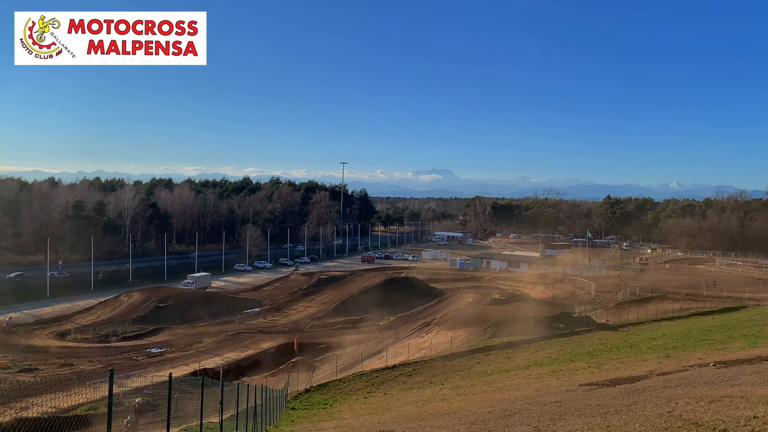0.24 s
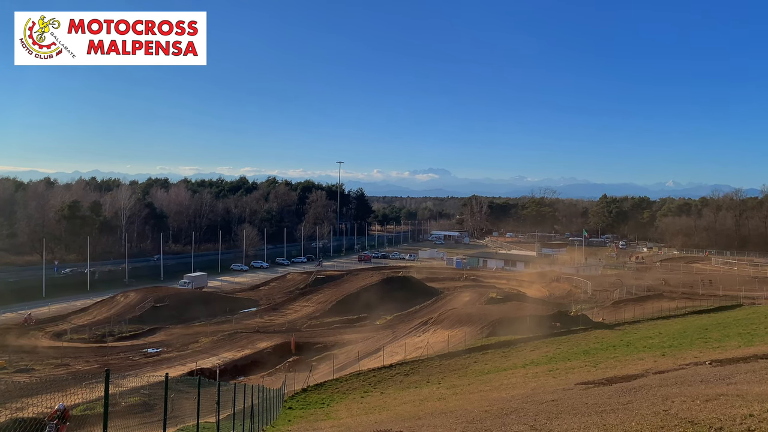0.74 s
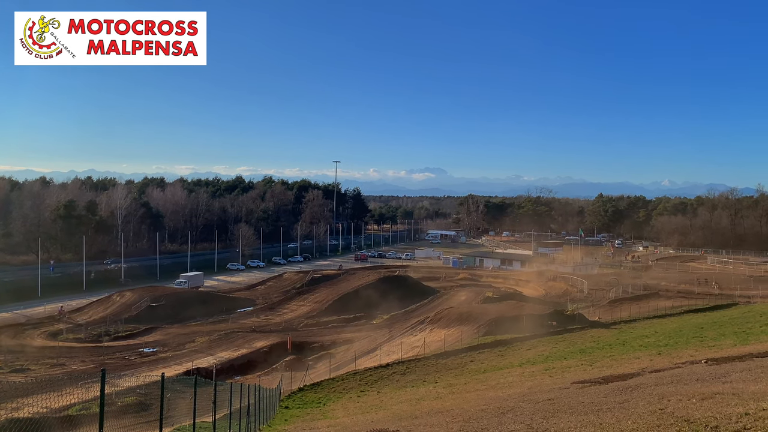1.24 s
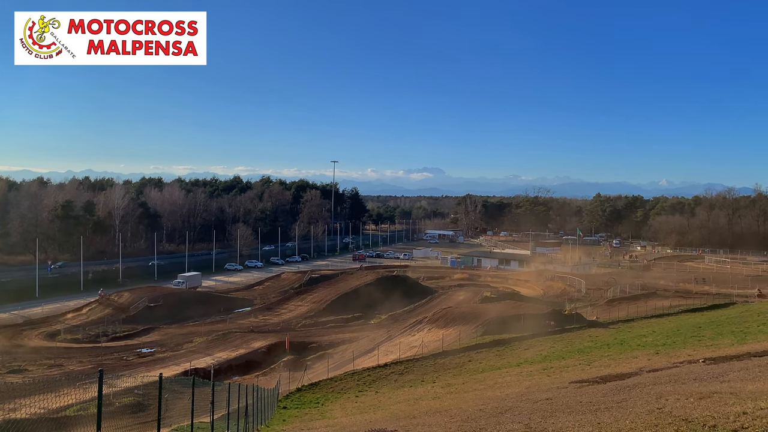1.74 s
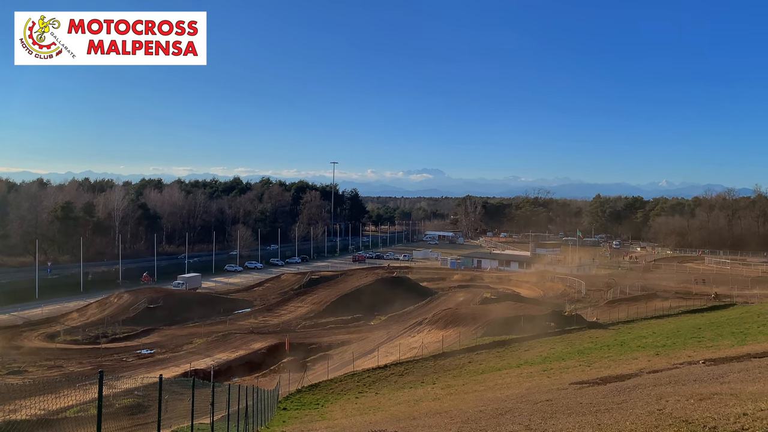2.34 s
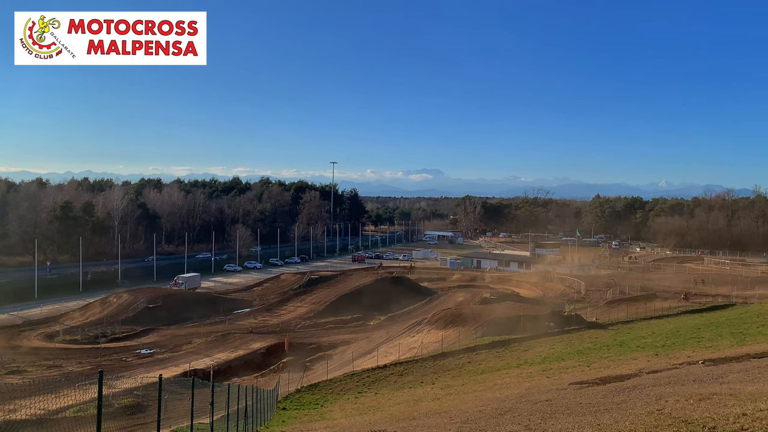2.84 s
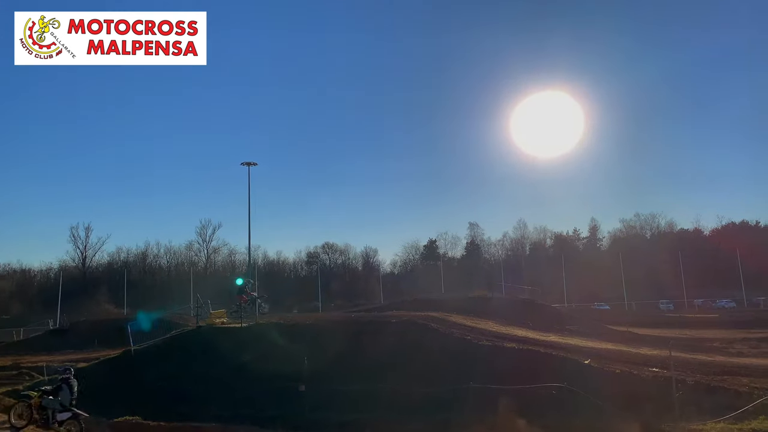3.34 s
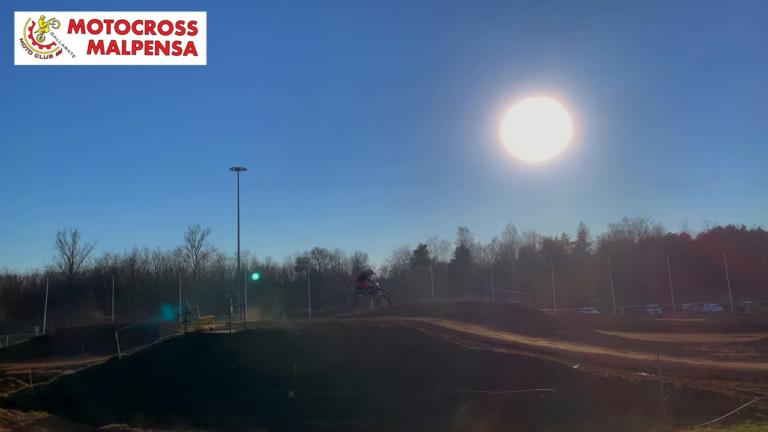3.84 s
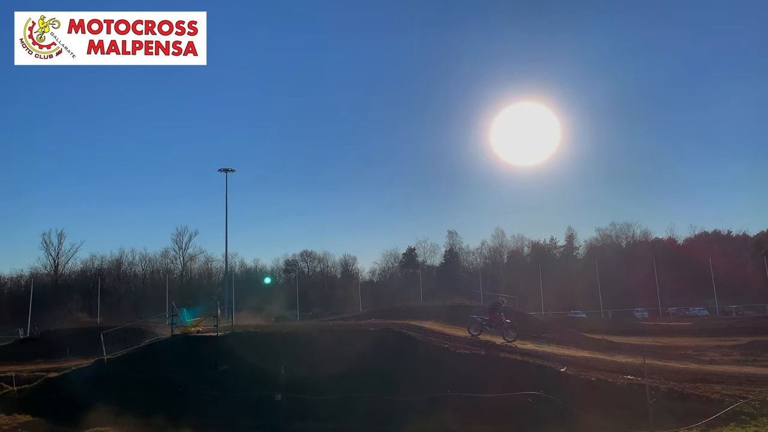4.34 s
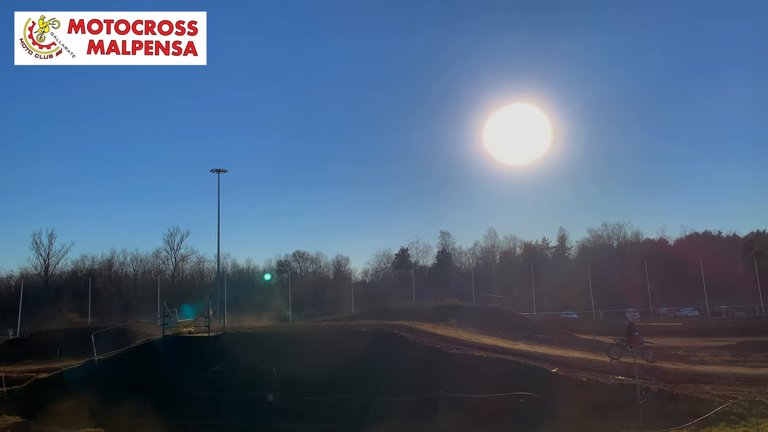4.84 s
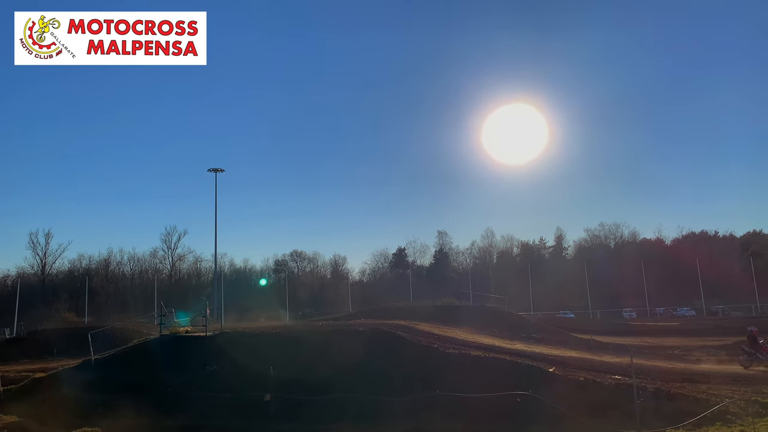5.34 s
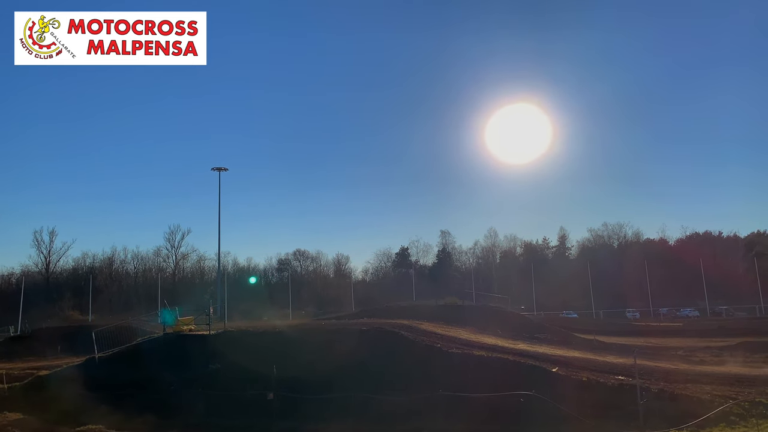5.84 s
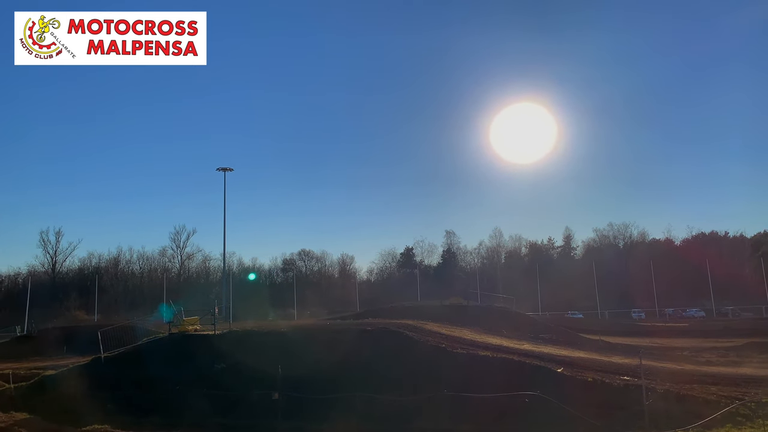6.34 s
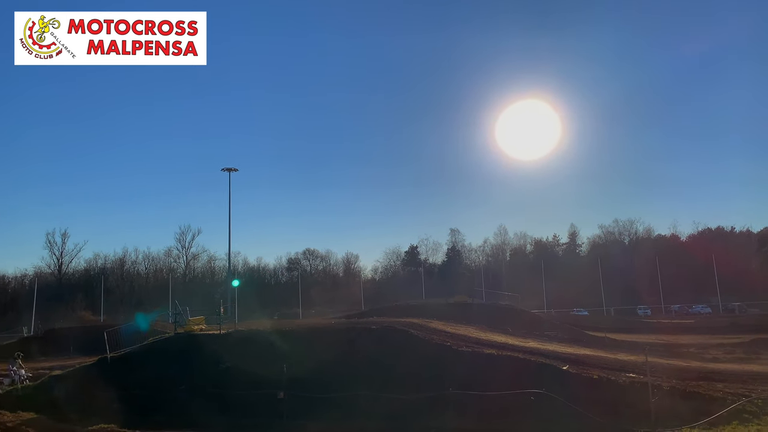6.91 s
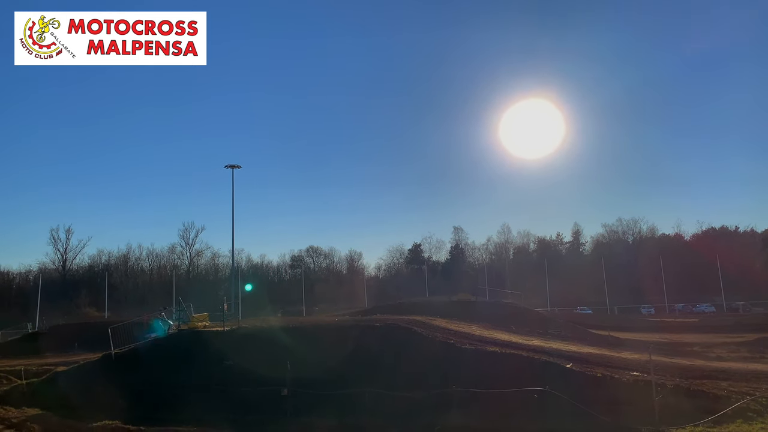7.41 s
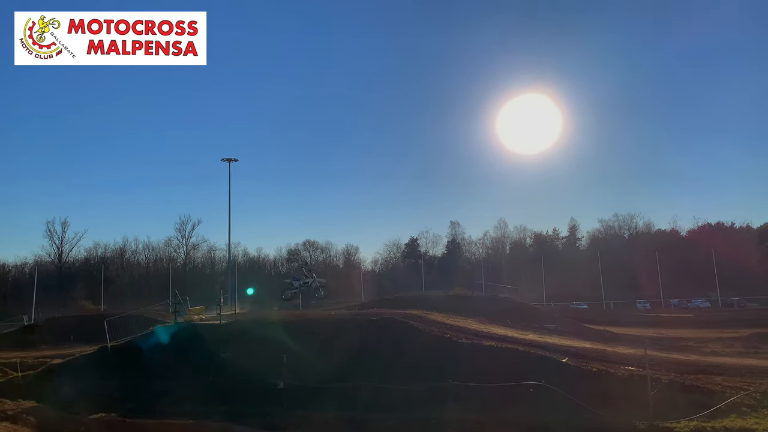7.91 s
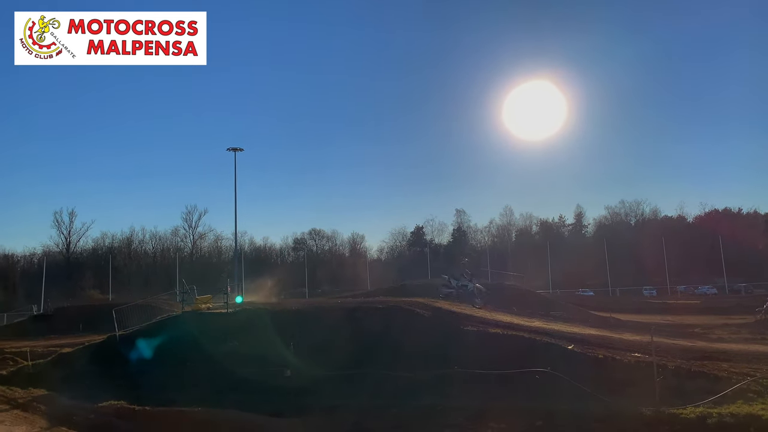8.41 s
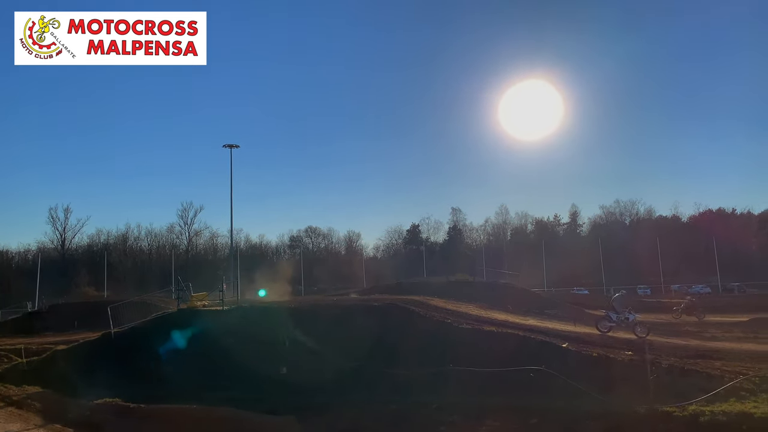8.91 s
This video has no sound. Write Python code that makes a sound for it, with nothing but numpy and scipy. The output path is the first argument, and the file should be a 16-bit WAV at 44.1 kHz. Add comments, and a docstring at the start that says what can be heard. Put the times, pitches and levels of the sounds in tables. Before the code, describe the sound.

Raspy single-cylinder motocross engines bark, pop and climb in pitch nearby, then thin out into farther passes above a low, flickering pack rumble outdoors.

```python
"""Dirt bikes rev, shift and pass on an open track, several at a time, over the roar of a far pack.
Each engine has one cylinder. Its firings give a low thump made of sine waves, a bark made of clicks
that ring the tailpipe, and a crack of coloured hiss; lone backfires add more bark and crack.
The far pack is flickering bands of noise. A two-port microphone hears it all, with a few echoes
of the bark and crack off the ground and banks."""
import sys
import numpy as np
from scipy import signal
from scipy.fft import rfft, irfft
from scipy.io import wavfile

SR = 44100
rng = np.random.default_rng(int(sys.argv[2]) if len(sys.argv) > 2 else 0)


def wrap_up_sound(samples):
    """Save the sound to the file named by the first command line argument, as 16-bit audio."""
    columns = np.atleast_2d(samples).T
    # keep every value between -1 and 1, then stretch to whole-number steps
    tamed = np.clip(columns, -1, 1)
    steps = np.round(tamed * 32767).astype(np.int16)
    wavfile.write(sys.argv[1], SR, steps)


N = 404397

PIPE_HZ = np.geomspace(390, 3400, 24)   # the resonances that the bark can ring


def from_db(db):
    """Turn a level in dB into a gain."""
    return 10 ** (np.asarray(db) / 20)


def rms_one(x):
    """Scale a signal to an rms of 1."""
    return x / np.sqrt(np.mean(x ** 2) + 1e-20)


def at_hz(points, hz):
    """Read a curve of (frequency, value) points, with frequency on a log axis."""
    points_hz, values = np.array(points).T
    return np.interp(np.log(hz + 1), np.log(points_hz), values)


def bump(hz, centre_hz, octaves):
    """A bell-shaped resonance of height 1 on a log frequency axis."""
    return np.exp(-.5 * (np.log2(hz / centre_hz) / octaves) ** 2)


def drift(rate_hz):
    """A slow random wander of spread 1: noise through two equal low-pass poles at rate_hz."""
    step = 40   # samples between the points of the slow curve
    r = np.exp(-2 * np.pi * step * rate_hz / SR)
    slow = signal.lfilter([1], [1, -2 * r, r * r], rng.standard_normal(N // step + 2002))
    slow = rms_one(slow[2000:])   # leave out the filter's start
    return np.interp(np.arange(N) / step, np.arange(len(slow)), slow)


def puff(clicks, decay_s):
    """Each click opens a burst of noise that dies away, with the click's energy on average."""
    r = np.exp(-1 / (decay_s * SR))
    envelope = signal.lfilter([np.sqrt(1 - r * r)], [1, -r], clicks + 1e-18)
    return envelope * rng.standard_normal(N)


def coloured(x, spectrum):
    """Lay a smooth spectrum on a sound, keeping its power if it starts out white."""
    gain = from_db(at_hz(spectrum, np.fft.rfftfreq(N, 1 / SR)))
    return irfft(rfft(x) * rms_one(gain), N)


def engines():
    """Follow every burst of throttle: its sines, and click trains for the pipe and the crack."""
    # engine speed, one list a burst, starting on a firing: (time [s], firing rate [1/s])
    speeds = [
        [(0.0, 107.5), (0.12, 101.96), (0.24, 93.04), (0.36, 87.3)],
        [(0.4331, 71.53), (0.6633, 75.93), (0.84, 75.5), (1.1, 86.5), (1.17, 77.6), (1.26, 77.5), (1.32, 83.2)],
        [(1.28, 79.4), (1.36, 87.0), (1.5167, 88.5), (1.73, 89.22), (2.05, 90.37)],
        [(0.15, 71.87), (0.2667, 67.76), (0.3833, 65.08), (0.5, 69.77)],
        [(1.4, 51.31), (1.55, 51.74), (1.7, 56.86), (1.85, 54.14), (2.0, 49.98), (2.15, 48.16), (2.3, 45.57),
         (2.45, 46.95)],
        [(1.2959, 86.5), (1.51, 96.57), (1.72, 103.26), (1.825, 104.4), (2.035, 102.62), (2.35, 106.05)],
        [(1.9373, 27.7), (2.075, 27.7), (2.13, 32.9), (2.2636, 34.45), (2.3682, 34.6), (2.4727, 38.47),
         (2.5773, 35.27), (2.6818, 44.63), (2.7864, 50.43), (2.8909, 47.72), (2.9955, 48.07), (3.1, 53.3)],
        [(2.4429, 63.92), (2.5467, 76.03), (2.6433, 88.51), (2.74, 100.84)],
        [(3.0684, 59.05), (3.1789, 59.16), (3.2778, 56.32), (3.3767, 58.15), (3.4756, 56.9), (3.5744, 55.32),
         (3.6733, 56.04), (3.7722, 56.02), (3.8711, 52.98), (3.97, 60.11)],
        [(3.652, 84), (3.8127, 90.35), (3.915, 90.97), (4.2, 93.96)],
        [(4.526, 42.1), (4.578, 34.83), (4.62, 46.43), (4.67, 55.77), (4.738, 62.34)],
        [(4.7296, 59.84), (4.853, 60.46), (4.954, 62.96), (5.055, 61.25), (5.156, 72.76), (5.257, 77.1),
         (5.358, 70.5), (5.459, 72.22), (5.56, 76.0)],
        [(4.6, 45.5), (4.8, 46.5), (4.95, 49), (5.062, 51.81), (5.2, 52.3), (5.394, 48.8), (5.6, 45),
         (5.726, 43.71), (5.892, 44.17), (6.058, 40.4), (6.556, 36.17), (6.722, 36.6), (6.888, 38.49),
         (7.054, 32.3), (7.22, 32.41), (7.552, 38.25), (7.718, 38.7), (7.884, 36.03), (8.05, 37.8), (8.3, 42.5)],
        [(5.7392, 53.77), (5.8467, 66.42), (5.9433, 80.56), (6.04, 100.43)],
        [(6.0312, 69.33), (6.1371, 71.22), (6.3314, 76.37), (6.4286, 79.81), (6.5257, 81.41), (6.6229, 81.26),
         (6.72, 80.88)],
        [(6.3, 55.78), (6.455, 61.22), (6.61, 59.52), (6.92, 65.87), (7.23, 63.08), (7.54, 55.35),
         (7.85, 48.02)],
        [(7.3708, 53.26), (7.4533, 53.09), (7.5267, 52.99), (7.6, 52.85)],
        [(7.4, 67.92), (7.5609, 70.45), (7.7218, 68.58), (7.8827, 72.07), (8.0436, 73.62), (8.2045, 68.15),
         (8.5264, 72.38), (8.6873, 69.18), (9.0091, 70.85), (9.17, 73.12)],
        [(7.7403, 50.61), (7.8562, 46.2), (7.9625, 44.26), (8.175, 41.15), (8.2812, 42.3), (8.3875, 41.73),
         (8.44, 44)],
        [(5.18, 51), (5.29, 61), (5.4, 73.5), (5.5, 78.5), (5.72, 81)],
        [(.57, 93), (.68, 87), (.8, 79)],
        [(8.6, 54.04), (8.7425, 57.42), (8.885, 57.99), (9.0275, 53.45), (9.17, 55.26)],
        [(3.187, 86), (3.27, 87), (3.32, 105), (3.52, 115)],
        [(8.4268, 46.5), (8.49, 48), (8.53, 53.5), (8.56, 56), (8.62, 56)],
        [(3.9, 44.4), (4.07, 41.2), (4.2, 40), (4.3, 37.5), (4.45, 33.5), (4.68, 31)],
    ]
    # load in the same bursts: (time [s], base level of the low orders [dB], bark level [dB])
    loads = [
        [(0, -20, -39), (.12, -17, -21.5), (.24, -18.5, -20.5), (.36, -20, -26)],
        [(.433, -35, -26.5), (.6, -26, -22.5), (.75, -29, -28), (.877, -23, -18.5), (1.1, -22, -20.5),
         (1.24, -16, -16), (1.32, -21, -17.5)],
        [(1.28, -41, -22), (1.34, -12.5, -15), (1.43, -15.5, -18.5), (1.62, -20.5, -26), (1.85, -16, -26.5),
         (1.97, -22.5, -36), (2.05, -32, -49)],
        [(.15, -25.5, -37), (.267, -13, -27), (.383, -25, -28.5), (.5, -54, -33)],
        [(1.4, -21.5, -41), (1.7, -17, -42), (1.9, -20.5, -22), (2.15, -22, -29.5), (2.45, -23.5, -68)],
        [(1.296, -39, -43), (1.405, -23, -28), (1.615, -13.5, -18), (1.75, -42, -20), (1.96, -25, -28),
         (2.06, -31, -31.5), (2.35, -43, -38.5)],
        [(1.937, -34, -37.5), (2.1, -24, -26), (2.17, -32, -45), (2.236, -30, -26), (2.27, -44, -36),
         (2.37, -28, -35.5), (2.5, -22, -29), (2.58, -20, -28), (2.71, -18.5, -23), (2.81, -33, -27.5),
         (2.92, -18.5, -19.5), (2.99, -24.5, -25.5), (3.1, -21.5, -32)],
        [(2.443, -43, -39), (2.547, -24.5, -22.5), (2.643, -22, -20.5), (2.74, -39, -34)],
        [(3.068, -24.5, -32.5), (3.25, -22.5, -27.5), (3.31, -21, -20), (3.42, -22.5, -21), (3.57, -22, -22.5),
         (3.77, -30, -30.5), (3.87, -35, -39), (3.97, -44, -46.5)],
        [(3.652, -38, -37), (3.813, -26.5, -39), (4.01, -56, -31), (4.105, -41, -34.5), (4.2, -50, -61)],
        [(4.526, -36, -55), (4.552, -24, -42), (4.578, -22, -28), (4.62, -23.5, -20), (4.67, -19, -17),
         (4.7, -23, -22), (4.738, -16, -32)],
        [(4.73, -38, -34), (4.853, -30.5, -33.5), (4.95, -34, -30.5), (5.06, -42, -31), (5.156, -45, -37.5),
         (5.25, -36, -38.5), (5.358, -32, -34.5), (5.56, -46, -43)],
        [(4.6, -36, -55), (4.8, -34, -39), (5.06, -27, -42), (5.4, -25, -47), (5.9, -25.5, -62),
         (6.2, -26, -66), (6.9, -27, -83), (7.2, -28.5, -50), (7.55, -25, -46), (8.05, -28, -58),
         (8.3, -33, -53)],
        [(5.739, -44, -54), (5.78, -46, -33), (5.847, -34, -29.5), (5.943, -38, -25), (6.04, -32, -34)],
        [(6.031, -26, -32), (6.15, -32, -34.5), (6.234, -25, -34), (6.4, -43, -32), (6.526, -29, -38),
         (6.62, -29, -38), (6.72, -27, -52)],
        [(6.3, -40, -63), (6.455, -35.5, -78), (6.65, -37.5, -48.5), (7.1, -35.5, -40), (7.385, -28.5, -57),
         (7.7, -33.5, -54), (7.85, -40, -48)],
        [(7.371, -33, -47), (7.48, -51, -38.5), (7.6, -34, -49)],
        [(7.4, -34, -63), (7.8, -34.5, -38), (8.044, -35, -43), (8.204, -25.5, -36), (8.366, -35, -42),
         (8.526, -35, -29), (8.65, -31, -35.5), (8.85, -33, -33), (9.17, -34, -50)],
        [(7.74, -35, -62), (7.856, -32, -39), (8.05, -29, -39), (8.2, -37, -41), (8.34, -36, -34),
         (8.44, -28, -41)],
        [(5.18, -48, -41), (5.3, -25.5, -31.5), (5.45, -29.5, -41), (5.58, -39, -52), (5.72, -38.5, -64)],
        [(.57, -14, -31), (.7, -17.5, -31), (.8, -12, -21)],
        [(8.6, -26, -36), (8.742, -25, -50), (8.885, -25, -52), (9.028, -35, -32), (9.17, -30, -47)],
        [(3.187, -31, -19), (3.25, -31, -31), (3.31, -29, -22), (3.42, -32.5, -27), (3.52, -34, -30)],
        [(8.428, -24, -36), (8.47, -18.5, -24), (8.53, -15.5, -17.5), (8.57, -19.5, -31), (8.62, -28, -50)],
        [(3.9, -23, -55), (4.07, -31, -58), (4.25, -28, -53), (4.45, -29.5, -55), (4.68, -28, -52)],
    ]
    # voice of each burst: (orders 1, 2, 3, 4, 5 against the base level [dB], silencer boom [Hz],
    # bark at start [Hz], bark at end [Hz], crack against bark [dB], width of the bark [octaves],
    # strength of the upper pipe mode [1 = as the bark])
    voices = [(-24, -2.5, -11, -24, -17.5, 340, 1500, 1170, -23.5, 0.26, 0.45),
              (-23, 1, -26, -6.5, -9, 432, 1330, 1234, -20.5, 0.19, 1),
              (0, -5, -17, -13, -14.5, 600, 1270, 1150, -27, 0.13, 0.67),
              (-5, -8, -29, -4.5, -13, 350, 4600, 770, -16, 0.27, 0.11),
              (-25, -13, -3, -8.5, -16, 180, 1200, 2040, -47, 0.13, 0.089),
              (0, -20, -37, -19, -27, 590, 1360, 1320, -18.5, 0.25, 1),
              (-9, 2.5, -11, -7.5, -17, 230, 1580, 2480, -5, 0.3, 0.64),
              (-27, -0.5, -21, -17, -12.5, 537, 1190, 1220, -21, 0.14, 0.94),
              (2, 3.5, -7.5, -2, -3.5, 343, 1146, 790, -12, 0.14, 0.23),
              (2, -16, -35, -29, -7, 250, 2150, 1930, -15, 0.15, 0.3),
              (-14, -18, -18, -11, -6.5, 276, 2300, 2020, -11, 0.35, 0.43),
              (-4, -4, -15, -6.5, -12, 270, 1730, 1580, -23, 0.13, 0.58),
              (-12.5, -3.5, -4, -11, -17, 149, 1600, 550, -13, 0.28, 0.12),
              (2.5, 4.5, -23, -37, -35, 400, 1550, 1930, -28.5, 0.23, 0.22),
              (1, -0.5, -10.5, -14.5, -24.5, 300, 1900, 1870, -33, 0.25, 0.45),
              (-13, 0, -5, -8, -10.5, 321, 2900, 3600, -11, 0.14, 0.17),
              (-17, -1, -10.5, -15, -5, 210, 1700, 1700, -8, 0.25, 0.19),
              (1, -3.5, -1, -10.5, -15, 356, 1800, 2300, -23, 0.76, 0.93),
              (-15, -33, -24, 1.5, -14, 390, 1260, 1450, -33, 0.07, 0.049),
              (-18, -23, 1, -8, -10.5, 272, 1350, 2700, -37, 0.14, 0.55),
              (-15, -5, -15.5, -11, -16.5, 147, 1200, 1530, -42, 0.17, .14),
              (-22, 4, -22, -12, -5.5, 294, 850, 910, -26, 0.3, 0.8),
              (-14, -3, 4.5, -5, -7.5, 350, 2000, 1950, -21, 0.21, 0.27),
              (-7, -14, -12, -11, -6.5, 306, 790, 1080, -20, 0.29, 1),
              (-20, -9, 0, -4.5, -14.5, 138, 1900, 1400, -9, 0.36, .12)]
    # pipe of each burst: (upper mode [multiple of the bark frequency], lift of the boom [dB],
    # strength of the silencer body [1 = as the bark])
    pipes = [(1.5, 9.5, 0.078), (1.33, 6, 0.21), (1.38, -2.5, 0.17), (1.5, 2, 0.24), (1.5, 4.5, 0.26),
             (1.35, 13, 0.11), (1.3, 10.5, 0.048), (1.4, 11.5, 0.12), (1.3, 3, 0.14), (1.3, 2, 0.12),
             (1.4, 11, 0.32), (1.37, 1.5, 0.17), (1.5, 6, .2), (1.3, 1, 0.16), (1.35, 2.5, 0.065),
             (1.5, 7, 0.25), (1.4, 9, 0.18), (1.5, 7.5, 0.17), (1.45, 10, 0.17), (1.3, 7.5, 0.25),
             (1.3, 4, 0.16), (2.2, 5, .2), (1.4, 3, 0.11), (1.65, 4, 0.26), (1.5, 1.5, .2)]
    # how unlike the firings of each burst are: raggedness [0 even - 1 ragged]
    raggedness = [.4, .2, .2, .4, .4, .2, 1, .3, .15, .2, .5, .2, .3, .2, .15, .3, .3, .3, .15, .2, .3, .2,
                  .3, .4, .3]
    pitch_scatter_octaves = .08   # of a fully ragged engine's bark
    tone, bark, crack = np.zeros(N), np.zeros((len(PIPE_HZ), N)), np.zeros(N)
    wobble = drift(33.0)
    wavers_db = [2.2 * drift(2.5) for order in range(12)]   # each order swells and sinks by itself
    crack_uneven, bark_uneven, pitch_uneven = rng.standard_normal((3, N))

    for speed, load, voice, pipe, ragged in zip(speeds, loads, voices, pipes, raggedness):
        *order_db, boom_hz, start_hz, end_hz, crack_db, octaves, upper = voice
        ratio, boom_db, body = pipe
        at = np.arange(round(speed[0][0] * SR), min(round(speed[-1][0] * SR), N))
        rate = np.interp(at / SR, *np.transpose(speed))
        load_s, *load_columns = np.transpose(load)
        thump_db, bark_db = [np.interp(at / SR, load_s, column) for column in load_columns]
        turns = np.cumsum(rate) / SR   # firing cycles so far

        order_levels = [thump_db + wavers_db[k - 1][at] + order_db[min(k, 5) - 1] for k in range(1, 13)]
        tone[at] += low_orders(rate, turns + 0.002 * wobble[at], order_levels, boom_hz, boom_db)

        fire = np.r_[0, np.flatnonzero(np.diff(np.floor(turns))) + 1]
        fire_at = at[fire]
        energy = np.sqrt(SR / rate[fire])   # one click carries a whole cycle's power
        crack_level = bark_db[fire] + crack_db + 2.5 * crack_uneven[fire_at]
        crack[fire_at] += energy * from_db(crack_level)

        bark_hz = np.geomspace(start_hz, end_hz, len(at))[fire]
        bark_hz = bark_hz * 2 ** (ragged * pitch_scatter_octaves * pitch_uneven[fire_at])
        share = pipe_shares(bark_hz, octaves, upper, ratio, body, ragged)
        bark_level = bark_db[fire] + 2.5 * ragged * bark_uneven[fire_at]
        bark[:, fire_at] += share * energy * from_db(bark_level)
    return tone, bark, crack


def low_orders(rate, turns, order_levels, boom_hz, boom_db):
    """Twelve sines at multiples of the firing rate, nearly in step, add up to a thump a cycle."""
    # colour laid on the low orders: (frequency [Hz], level [dB])
    exhaust_colour = [(25, -2), (60, -5.5), (120, -2), (250, -3), (450, -4.5), (800, 3)]
    lag_s, smear_turns = .001, .1   # rise just after the blast; random offset of each order
    boom_octaves, fade_s = 0.15, 0.022
    place = np.arange(len(rate))
    fade = np.clip(np.minimum(place, place[::-1]) / (fade_s * SR), 0, 1)
    tone = np.zeros(len(rate))
    for k, level_db in enumerate(order_levels, 1):
        hz = k * rate
        level_db = level_db + at_hz(exhaust_colour, hz) - 3.14 * max(k - 5, 0)
        level_db = level_db + boom_db * bump(hz, boom_hz, boom_octaves)
        order_turns = k * (turns - lag_s * rate) + smear_turns * rng.standard_normal()
        tone += np.sqrt(2) * fade * from_db(level_db) * np.sin(2 * np.pi * order_turns)
    return tone


def pipe_shares(bark_hz, octaves, upper, ratio, body, ragged):
    """Split each firing among the pipe resonances: bark, upper mode and silencer body."""
    colour_scatter_db = 4.5   # in each resonance of a fully ragged engine
    hz = PIPE_HZ[:, None]
    share = bump(hz, bark_hz, octaves)
    share += upper * bump(hz, ratio * bark_hz, 0.12)
    share += body * bump(hz, 0.32 * bark_hz, 0.41)
    share *= from_db(ragged * colour_scatter_db * rng.standard_normal(share.shape))
    return share / np.sqrt(np.sum(share ** 2, axis=0))


def add_backfires(bark, crack):
    """A lone backfire is one strong click for the crack and for the upper pipe resonances."""
    # lone backfires, before a common lift: (time [s], crack level [dB], bark level [dB])
    backfires = [(0.182, -21, -18), (0.2203, -17.5, -13), (0.263, -21, -15), (0.3536, -35, -37),
                 (0.6457, -32, -13), (0.687, -28, -17), (0.73, -20, -12.5), (0.7726, -24, -17),
                 (1.076, -22, -42), (1.101, -19.5, -42), (1.128, -27, -38), (1.165, -31, -28),
                 (3.856, -22.5, -41), (7.513, -40, -47), (7.5394, -33, -33), (7.565, -31, -38),
                 (7.839, -30, -43), (7.898, -46, -32), (8.4753, -17.5, -21)]
    for time_s, crack_db, bark_db in backfires:
        at = round(time_s * SR)
        crack[at] += from_db(crack_db + 18.0)
        bark[15:, at] += from_db(bark_db + 13.5)


def tailpipe(bark, noisy=.09):
    """Blast front plus turbulent puff ring the pipe resonances, each a steep pair that swells and dies."""
    out = np.zeros(N)
    for k, (hz, clicks) in enumerate(zip(PIPE_HZ, bark)):
        r = np.exp(-np.pi * .115 * hz / SR)   # bandwidth is .115 of the frequency
        poles = [1, -2 * r * np.cos(2 * np.pi * hz / SR), r * r]
        zeros = np.array([1, 0, -1])
        blast = (1 - noisy) * clicks + noisy * puff(clicks, 0.0012)
        once = signal.lfilter(np.sqrt(1 - r * r) * zeros, poles, blast + 1e-18)
        twice = signal.lfilter((1 - r * r) / 2 * zeros, poles, once)
        out += (-1) ** k * twice   # neighbours take opposite signs
    # the bark dulls on its way
    return signal.sosfilt(signal.butter(2, 3500, fs=SR, output="sos"), out)


def crack_hiss(crack):
    """Sharp clicks and short puffs of noise, coloured to a bright crack."""
    # colour of the crack; only the shape counts: (frequency [Hz], relative level [dB])
    crack_colour = [(2800, -20), (3500, 31.5), (4400, 35.5), (5300, 29), (6200, 29.5), (7300, 24.5),
                    (8600, 8), (10500, 27), (13500, 7.5), (15500, 22.5)]
    return coloured(0.15 * crack + 0.9 * puff(crack, 0.004), crack_colour)


def scattered(x, spread_s):
    """The sound smeared by random tails of scatter that blend into each other as the riders move."""
    tails = rng.standard_normal((2, 6000)) * np.exp(-np.arange(6000) / (spread_s * SR))
    tails /= np.sqrt(np.sum(tails ** 2, axis=1, keepdims=True))
    blend = 2 * np.pi * drift(1.5)
    first, second = [signal.fftconvolve(x, tail)[:N] for tail in tails]
    return np.cos(blend) * first + np.sin(blend) * second


def with_echoes(blast):
    """Add later, softer copies thrown back by the ground and banks."""
    # echoes: (delay [s], level against the direct sound [dB])
    echoes = [(.0037, -19), (.0071, -17), (.0125, -19), (.023, -19)]
    heard = blast.copy()
    for lag_s, db in echoes:
        lag = round(lag_s * SR)
        heard[lag:] += from_db(db) * blast[:-lag]
    return heard


def pack(patchy_db):
    """Many far engines melt into a roar: third-octave noise bands that flicker, in six groups."""
    # levels of the far pack: (time [s], rumble [dB], rasp [dB], hiss [dB], air [dB])
    pack_levels = [(0, -14, -27, -66, -51.5), (.61, -17, -34, -42, -52), (.85, -17.5, -29.5, -54, -66),
                   (1.2, -17.5, -30.5, -37, -43), (1.45, -19.5, -30, -42.5, -86),
                   (1.75, -23.5, -31, -37, -56), (2.2, -22.5, -37.5, -49.5, -49.5),
                   (2.66, -20.5, -37.5, -41, -51.5), (3.15, -22.5, -28.5, -47, -42.5),
                   (3.4, -32.5, -32, -37.5, -36.5), (3.6, -31.5, -33.5, -34.5, -41),
                   (3.86, -20.5, -36.5, -43.5, -47), (3.96, -31, -40.5, -54.5, -56),
                   (4.3, -28, -44.5, -58.5, -60.5), (4.75, -25.5, -40, -57, -53.5),
                   (5.3, -29, -42, -56, -63), (5.7, -30.5, -50, -60, -71), (6.0, -34, -36.5, -44.5, -73),
                   (6.15, -29, -42, -55, -99), (6.55, -32.5, -42.5, -54, -95), (6.82, -30, -48, -49, -56),
                   (7.1, -31, -48.5, -44.5, -51.5), (7.41, -29, -45, -58, -66),
                   (7.7, -29, -41.5, -53.5, -53), (7.92, -26.5, -38.5, -54, -49),
                   (8.3, -25.5, -38, -50, -53), (8.65, -25, -35, -46, -47), (9.17, -20, -37, -52, -49.5)]
    # balance of the bands inside each group: (frequency [Hz], relative level [dB])
    pack_colour = [(25, -35), (45, -1.5), (80, 12), (140, 9), (300, -5), (620, -14.5), (1300, -21),
                   (2200, -29.5), (3300, -33), (4500, -28), (5500, -54.5), (6300, -12.5), (7300, -26),
                   (8600, -139), (10300, -6.5), (12000, -16), (13500, -32.5), (15200, -66)]
    t = np.arange(N) / SR
    level_s, *columns = np.transpose(pack_levels)
    rumble, high_rasp, hiss, air = [np.interp(t, level_s, column) for column in columns]
    # the drone follows the rumble's swing about -40.5 dB, and the low rasp that of the high rasp
    drone = -40.5 - 10 + 1.074 * (rumble + 40.5)
    low_rasp = -40.5 - 5 + 1.08 * (high_rasp + 40.5)

    groups, together = np.zeros((6, N)), drift(50.0)
    edges = 28 * 2 ** np.arange(0, 9.4, 1 / 3)
    white = rng.standard_normal((2, N))
    for k, (low, high) in enumerate(zip(edges, edges[1:])):
        band_filter = signal.butter(2, [low, high], "band", fs=SR, output="sos")
        band = signal.sosfilt(band_filter, white[k % 2])   # neighbours use different noise
        hz = np.sqrt(low * high)
        group = np.searchsorted([220, 700, 1400, 3200, 5600], hz)
        if group > 1:   # the higher bands flicker partly together
            flicker = .5 * together + .5 * drift(7.9)
        else:
            flicker = drift(8.7)
        groups[group] += band * from_db(at_hz(pack_colour, hz) + patchy_db * flicker)
    levels = (rumble, drone, low_rasp, high_rasp, hiss, air)
    return sum(rms_one(group) * from_db(db) for group, db in zip(groups, levels))


def ports(x):
    """Left and right are sum plus and minus a difference: direct sound shifted in phase, and scatter."""
    # difference of the ports against their sum: (frequency [Hz], level [dB])
    side_db = [(60, -7.5), (99, -17.5), (160, -10), (270, -9.5), (450, -4), (740, -0.5), (1220, 4),
               (2010, -2), (3330, 5), (5500, -4), (9080, 4.5), (15000, -5)]
    # how far the direct difference leads in phase: (frequency [Hz], lead [radians])
    side_lead = [(60, 0.8), (400, 0.9), (1000, 1.2), (2400, 1.55), (4500, 1.9), (8000, 1.6), (15000, 1.55)]
    # scatter in the difference: (frequency [Hz], amplitude share [0 - 1])
    scatter = [(60, .75), (500, .7), (1200, .88), (2200, .7), (4000, .82), (8000, .5), (12000, .75)]
    # the riders drift to the right: (time [s], left minus right [dB])
    lean = [(0, 0.8), (3.6, .5), (5, 0), (6, -0.3), (9.17, -1.5)]
    hz = np.fft.rfftfreq(N, 1 / SR)
    share = at_hz(scatter, hz)
    direct = np.sqrt(1 - share ** 2) * np.exp(1j * at_hz(side_lead, hz)) * rfft(x)
    diffuse = share * rfft(scattered(x, .025))
    side = irfft(from_db(at_hz(side_db, hz)) * (direct + diffuse), N)
    lean_db = np.interp(np.arange(N) / SR, *np.transpose(lean))
    return np.array([x + side, x - side]) * from_db([lean_db / 2, -lean_db / 2])


def scene():
    """All engines with their echoes and the far pack, at the two ports."""
    tone, bark, crack = engines()
    add_backfires(bark, crack)
    pipe = tailpipe(bark)
    pipe = pipe + from_db(-12) * scattered(pipe, .006)   # the rough ground draws each bark out
    blast = from_db(-5.5) * pipe + from_db(-5.0) * crack_hiss(crack)
    return ports(tone + with_echoes(blast) + pack(patchy_db=2.97))


def record(dry):
    """The bass rolls off, two hollows are cut, peaks are rounded, the top is cut."""
    # hollows in the microphone's response: (centre [Hz], width [Hz], share taken out [0 - 1])
    hollows = [(1557, 350, 0.36), (3267, 1550, 0.45)]
    dry = signal.sosfilt(signal.butter(4, 40, "high", fs=SR, output="sos"), dry)
    for hz, width_hz, share in hollows:
        peak = signal.iirpeak(hz, hz / width_hz, fs=SR)
        dry = dry - share * signal.lfilter(*peak, dry)
    dry = 1.5 * np.tanh(dry / 1.5)
    top_cut = signal.cheby2(14, 70, 15900 * 1.03, fs=SR, output="sos")   # 70 dB down from this edge
    return signal.sosfilt(top_cut, dry)


dry = scene()
out = record(dry)
wrap_up_sound(out)
```